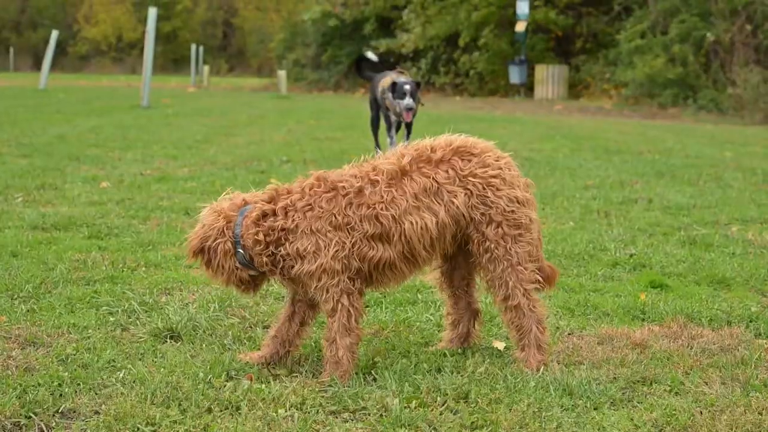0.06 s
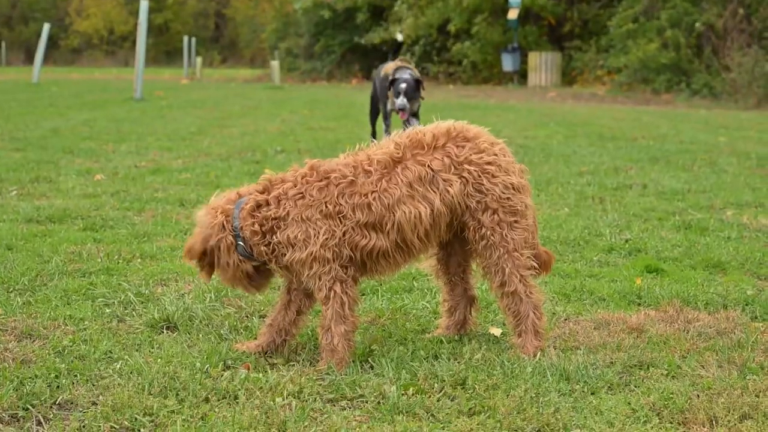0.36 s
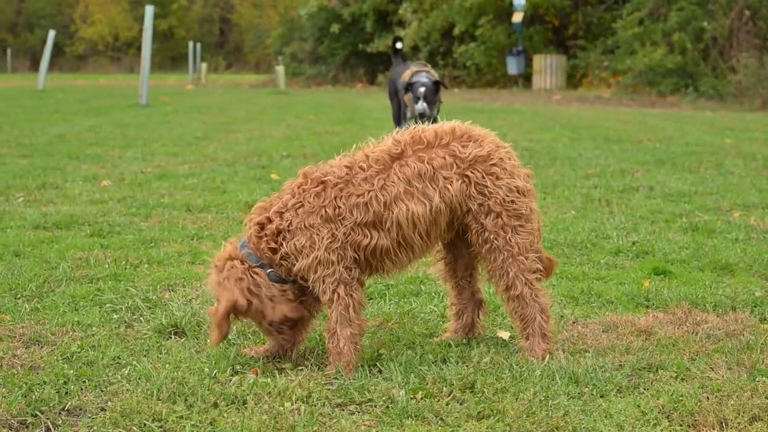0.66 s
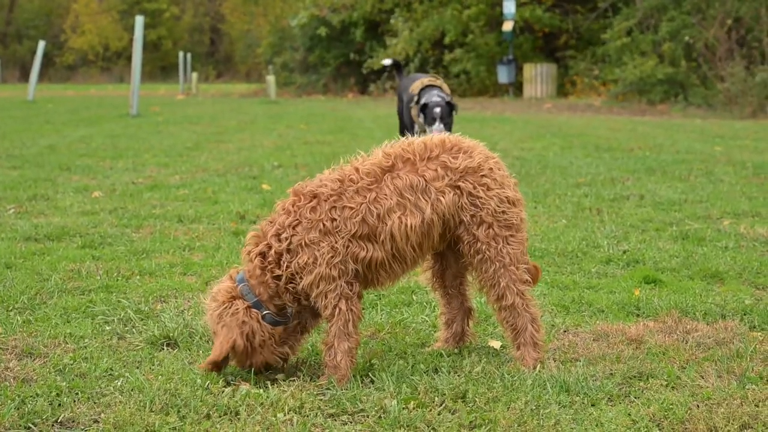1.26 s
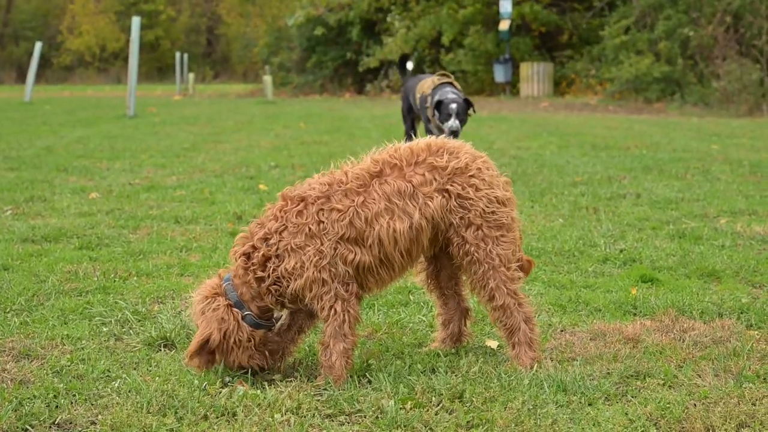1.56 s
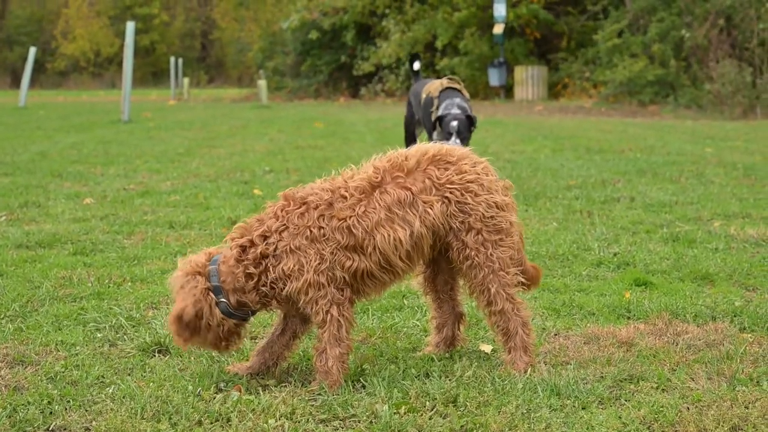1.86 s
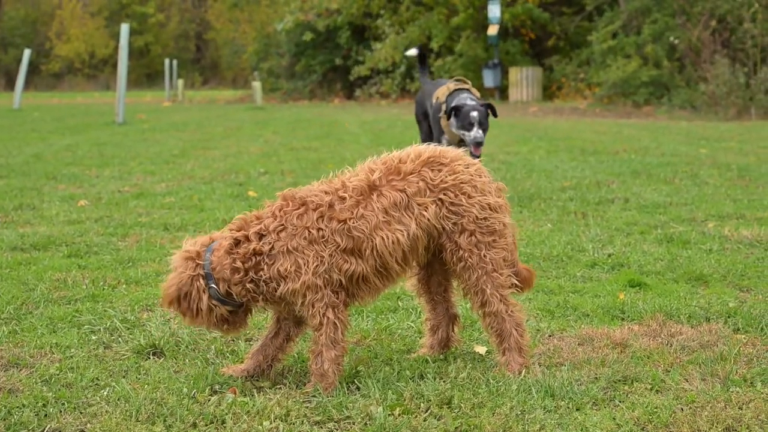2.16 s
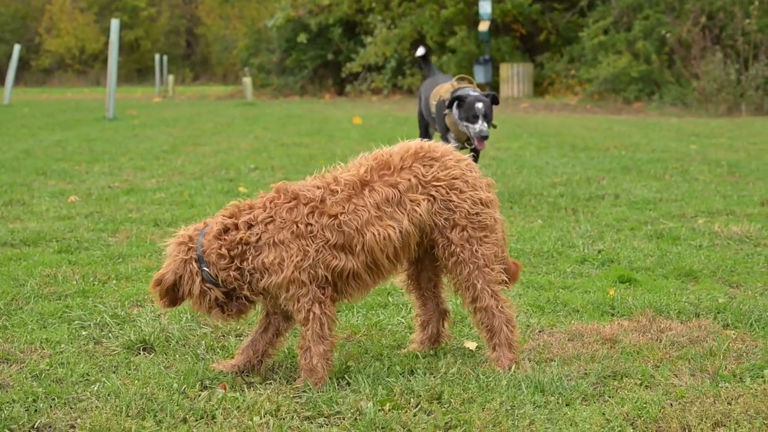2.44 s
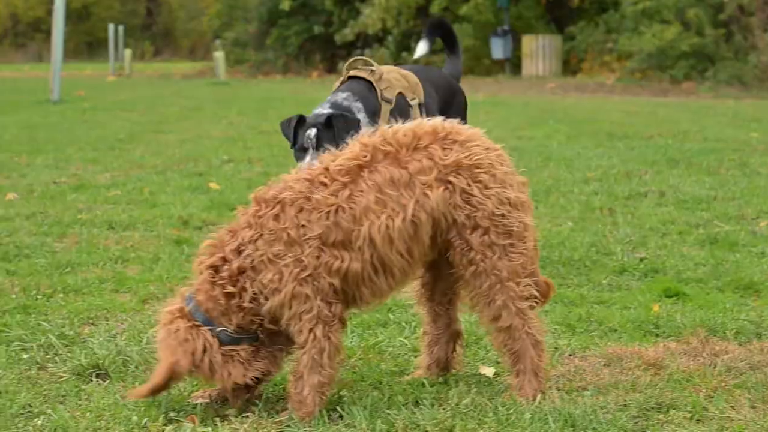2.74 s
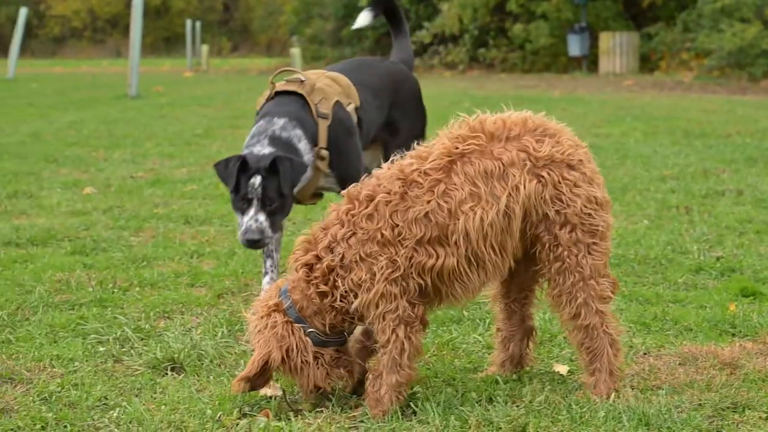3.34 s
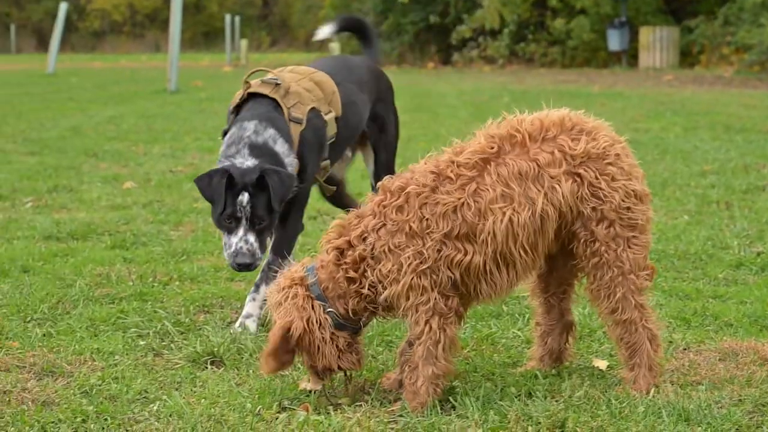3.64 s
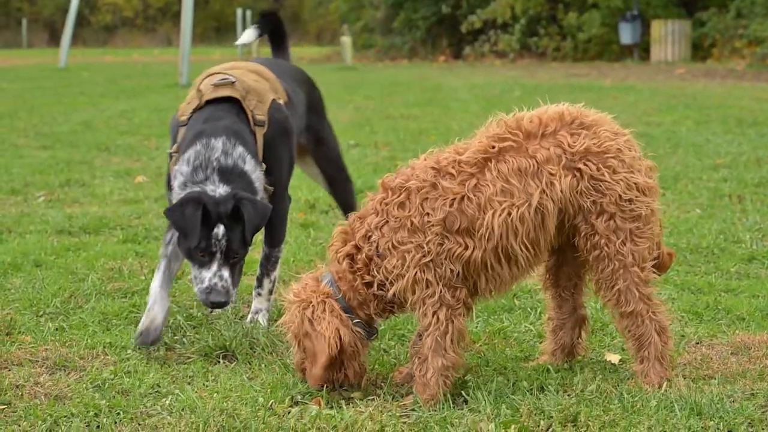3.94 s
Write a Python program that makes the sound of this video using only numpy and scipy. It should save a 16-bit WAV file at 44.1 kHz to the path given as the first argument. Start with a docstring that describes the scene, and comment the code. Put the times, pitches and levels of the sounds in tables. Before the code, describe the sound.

Gusts of wind rumble and sputter against the microphone outdoors, drop to a lull, then hit hardest near the end. A soft hiss of air and distant leaves continues behind them, with barely audible grass rustles and faint ticks.

```python
"""Low, gusty wind rumble buffets a camera's two microphone ports in an open park.
Large eddies rumble in both ports alike; faster ones flutter, roar, rasp and slap, their upper
part mostly on the windward port. Under them lie a steady hiss of air and distant leaves,
a few soft rustles as two dogs nose through the grass, and faint sharp ticks."""
import sys
import numpy as np
from scipy.fft import rfft, irfft, next_fast_len
from scipy.io import wavfile
from scipy.ndimage import uniform_filter1d, map_coordinates

SR = 44100
rng = np.random.default_rng(int(sys.argv[2]) if len(sys.argv) > 2 else 0)


def wav_out(sig):
    """Save sig, one row per channel (or a flat mono array), as 16-bit PCM at SR to the path in sys.argv[1]."""
    wavfile.write(sys.argv[1], SR, np.round(np.clip(np.atleast_2d(sig).T, -1, 1) * 32767).astype(np.int16))


N = 176400

# gust strength: time_s, level_db
GUST_LEVELS = [(0.0, -58), (0.03, -34.5), (0.07, -45.5), (0.12, -26.5), (0.14, -35.5), (0.21, -30.5),
               (0.24, -40), (0.42, -35.5), (0.5, -44.5), (0.58, -38.5), (0.63, -44), (0.68, -34.5),
               (0.71, -44.5), (0.77, -34), (0.89, -49.5), (0.91, -40), (0.97, -65), (1.02, -42),
               (1.12, -39), (1.2, -44.5), (1.27, -33), (1.29, -40.5), (1.37, -31.5), (1.4, -45), (1.5, -36),
               (1.54, -44), (1.57, -35), (1.6, -32), (1.73, -43), (1.78, -36), (1.82, -38), (1.93, -39),
               (1.96, -38), (1.98, -33.5), (2.06, -43), (2.09, -45), (2.27, -37), (2.44, -64), (2.47, -50),
               (2.51, -62.5), (2.55, -43.5), (2.58, -54), (2.7, -43), (2.74, -55.5), (2.97, -50.5),
               (3.05, -55), (3.1, -41), (3.21, -37.5), (3.29, -49), (3.35, -32.5), (3.41, -25),
               (3.44, -26.5), (3.46, -28.5), (3.51, -36), (3.63, -23.5), (3.66, -38), (3.68, -29.5),
               (3.92, -27.5), (3.93, -32.5), (4.0, -34)]
# large-eddy spectrum: freq_hz, density_db
RUMBLE_SPECTRUM = [(12, -44), (25, -7), (45, -2), (80, 3), (130, 2), (200, -1.5), (280, -7), (380, -16),
                   (550, -31), (900, -53), (1500, -85)]
def rumble(ref_db=-32.5, growth=0.98, lump_db=4.5, lumps_per_s=70):
    """Large slow eddies press on the ports in lumps as the gusts come and go."""
    pressure = evened(noise(RUMBLE_SPECTRUM), window_samples=800)
    lumps = flicker(lump_db, lumps_per_s)
    level_db = ref_db + growth * (curve(GUST_LEVELS) - ref_db)
    return unit(pressure * lumps) * amp(level_db)


# strength of the fast flow, also drives churn and rasp: time_s, level_db
FLOW_LEVELS = [(0.0, -48), (0.03, -62.5), (0.2, -37), (0.28, -50), (0.44, -33), (0.47, -51.5),
               (0.62, -61.5), (0.68, -43), (0.72, -50), (0.73, -36), (0.78, -40), (0.79, -31),
               (0.83, -53.5), (0.97, -68.5), (1.14, -49.5), (1.15, -61.5), (1.27, -43), (1.35, -54.5),
               (1.37, -38), (1.39, -67), (1.41, -47), (1.47, -63), (1.49, -38.5), (1.53, -51.5),
               (1.63, -39), (1.64, -55), (1.66, -39.5), (1.76, -55), (1.77, -38.5), (1.85, -51),
               (1.86, -40.5), (2.05, -54), (2.21, -63), (2.22, -41.5), (2.24, -66), (2.25, -47),
               (2.39, -63.5), (2.64, -62.5), (2.71, -54), (2.74, -72.5), (3.17, -60), (3.21, -46),
               (3.24, -67), (3.33, -67), (3.35, -37), (3.36, -45), (3.4, -30), (3.42, -38), (3.52, -40),
               (3.58, -50.5), (3.6, -30.5), (3.61, -44.5), (3.63, -33), (3.65, -37), (3.7, -26),
               (3.72, -41), (3.85, -30), (3.91, -36), (3.92, -31), (4.0, -32)]
FLOW_REF_DB, CALM_DB = -50.5, -56.5
def flutter(eddies_per_s=170, ref_hz=366, octaves_per_db=-0.0861, gain_db=-4.5, tilt_db_per_octave=-1.5):
    """Small eddies sputter at uneven moments, louder and lower in a stronger flow."""
    jitter, strength, size, turn = rng.standard_normal((2000, 4)).T
    time_s = (np.arange(len(jitter)) + 0.458 * jitter) / eddies_per_s
    flow_db = np.interp(time_s, *np.transpose(FLOW_LEVELS))
    spread_octaves = 0.31 * np.clip(size, -2, 2)
    pitch_hz = ref_hz * 2 ** (octaves_per_db * (flow_db - FLOW_REF_DB) + spread_octaves)
    level_db = flow_db + gain_db + np.clip(strength, -2, 1.5)
    level_db += tilt_db_per_octave * spread_octaves  # smaller eddies are weaker
    level_db -= np.maximum(CALM_DB - flow_db, 0)  # they die out in a weak flow
    rows = np.transpose([time_s, level_db, pitch_hz, np.pi * turn])
    return eddies(rows[time_s < N / SR], width_cycles=0.4)


# dense churning around the ports: freq_hz, density_db
CHURN_SPECTRUM = [(100, -12.5), (190, -3.5), (290, 3.5), (400, -2), (520, -7.5), (700, -14), (1000, -30),
                  (1600, -72.5)]
def churn(growth=1.128, gain_db=-1.5):
    """Countless middling eddies merge into a hollow roar as the flow hardens."""
    level_db = FLOW_REF_DB + growth * (curve(FLOW_LEVELS) - FLOW_REF_DB)
    roar = evened(noise(CHURN_SPECTRUM), window_samples=450)
    return unit(roar * flicker(depth_db=3.65, knots_per_s=95)) * amp(level_db + gain_db)


# single hard eddies: centre_s, level_db, pitch_hz
HARD_EDDIES = [(0.1773, -29.5, 840), (.2, -27.5, 544), (0.3382, -30, 406), (0.3627, -26, 546),
               (.377, -31.5, 980), (.408, -21, 456), (.4413, -17, 700), (.676, -27.5, 412),
               (.735, -30, 446), (0.7409, -23, 500), (.7875, -19.5, 364), (1.131, -30.5, 363),
               (1.268, -27, 181), (1.331, -29.5, 360), (1.37, -23.5, 327), (1.497, -35, 464),
               (1.597, -25, 345), (1.607, -15.5, 188), (1.626, -24, 400), (1.771, -24.5, 306),
               (1.794, -20.5, 200), (1.862, -23, 446), (1.879, -28, 415), (1.911, -25.5, 405),
               (1.926, -27, 434), (1.984, -27, 162), (2.258, -25.5, 370), (2.69, -30.5, 226),
               (3.1, -30, 143), (3.191, -25, 189), (3.389, -18.5, 380), (3.596, -24.5, 414),
               (3.63, -18.5, 393), (3.696, -21.5, 610), (3.743, -19.5, 410), (3.811, -25, 547),
               (3.8548, -17, 930), (3.9118, -16.5, 133), (3.944, -21, 545)]
def slaps(gain_db=-1):
    """The hardest eddies hit the ports one by one."""
    rows = [(centre_s, level_db + gain_db, pitch_hz, np.pi)
            for centre_s, level_db, pitch_hz in HARD_EDDIES]
    return eddies(rows, width_cycles=0.27)


# fine eddies at the port's edge: freq_hz, density_db
RASP_SPECTRUM = [(300, -18), (480, 5), (650, 1.5), (850, -1), (1200, -10), (1700, -20), (2300, -33.5),
                 (3500, -63)]
def rasp(growth=1.43, gain_db=-19.5):
    """The finest eddies spit in short bursts, growing faster than the flow."""
    level_db = FLOW_REF_DB + growth * (curve(FLOW_LEVELS) - FLOW_REF_DB)
    bursts = noise(RASP_SPECTRUM) * flicker(depth_db=8.3, knots_per_s=170)
    return unit(bursts) * amp(level_db + gain_db)


# where the wind strikes: time_s, side (-1 right port, +1 left port)
WIND_SIDE = [(0, -0.99), (2.3, -0.94), (3.2, -0.56), (3.35, 1)]
def wind(mono_hz=160, split_hz=760):
    """The bass is the same in both ports; the upper part leans to the windward one."""
    pressure = rumble() + churn() + flutter() + rasp() + slaps()
    above_mono = lambda hz: 1 - 1 / (1 + (hz / mono_hz) ** 6)
    upper = filtered(pressure, lambda hz: above_mono(hz) * hz ** 2 / (hz ** 2 + split_hz ** 2))
    side = curve(WIND_SIDE) * upper
    return np.array([pressure + side, pressure - side])


# background at the left port: freq_hz, density_db
HISS_LEFT_SPECTRUM = [(30, -22), (200, -25), (400, -11.5), (650, 11), (1000, 8.5), (1500, 7), (2200, 5),
                      (3000, 0), (4200, 1), (5200, 1), (6000, -1), (7300, -6), (9000, -5), (10150, -1),
                      (11000, -9.5), (12000, -20), (13500, -30)]
# background at the right port: freq_hz, density_db
HISS_RIGHT_SPECTRUM = [(30, -7), (200, -34), (400, -21.5), (650, 8), (1000, 8.5), (1500, 6), (2200, 5.5),
                       (3000, 3), (4000, 2.5), (5000, -1.5), (6000, -8), (7500, -10), (9200, -11.5),
                       (10500, -9.5), (11900, -3.5), (12600, -11), (13500, -23)]
# left-right likeness: freq_hz, correlation
HISS_CORRELATION = [(300, 1), (700, 1), (1200, 0.72), (2000, 0.016), (4000, 0.35), (7000, 0.19), (12000, 0)]
def hiss(left_db=-58.5, right_db=-60.5, fade_db_per_s=0.5):
    """Air and distant leaves hiss, coloured by each port's own resonance and fading slightly."""
    angle = lambda hz: np.arccos(np.clip(along(HISS_CORRELATION, hz), -1, 1)) / 2
    white = rng.standard_normal((2, N))
    mid, side = filtered(white, lambda hz: np.array([np.cos(angle(hz)), np.sin(angle(hz))]))
    left = amp(left_db) * coloured(mid + side, HISS_LEFT_SPECTRUM)
    right = amp(right_db) * coloured(mid - side, HISS_RIGHT_SPECTRUM)
    drift_db = 0.6 * wobble(knots_per_s=3.65) - fade_db_per_s * (np.arange(N) - N / 2) / SR
    return amp(drift_db) * np.array([left, right])


# swishes in the grass: peak_s, rise_s, fall_s, left_db, right_db
GRASS_SWISHES = [(.28, .2, 0.11, -77, -74), (.86, 0.054, .08, -80, -71), (1.05, 0.021, 0.048, -60, -69),
                 (1.2, 0.072, .08, -69, -67), (2.25, 0.36, 0.075, -79, -69.5)]
# grass at the left port: freq_hz, density_db
GRASS_LEFT_SPECTRUM = [(3000, -30), (6500, -13), (8800, -11), (9600, 2), (10600, -2), (11400, -12),
                       (14000, -30)]
# grass at the right port: freq_hz, density_db
GRASS_RIGHT_SPECTRUM = [(3000, -17), (6500, -4), (10000, -12), (11200, 5), (12000, 3), (13000, -2),
                        (14500, -15)]
def rustles(grain_db=2.7):
    """Dogs brush the grass in thin, grainy swishes that swell and fade."""
    t, swell = np.arange(N) / SR, np.zeros((2, N))
    for peak_s, rise_s, fall_s, left_db, right_db in GRASS_SWISHES:
        width_s = np.where(t < peak_s, rise_s, fall_s)
        swell += amp([[left_db], [right_db]]) * np.exp(-((t - peak_s) / width_s) ** 2)
    grain = unit(amp(grain_db * wobble(knots_per_s=160)))
    return swell * grain * np.array([noise(GRASS_LEFT_SPECTRUM), noise(GRASS_RIGHT_SPECTRUM)])


# dry contacts: start_s, level_db, t60_s
CONTACTS = [(3.3373, -48, 0.013), (3.394, -58, .008), (3.5645, -52, .009), (3.7206, -43, .012),
            (3.7347, -48, 0.0067), (3.7652, -57, .025)]
# contact spectrum: freq_hz, density_db
TICK_SPECTRUM = [(2000, -23), (5000, -12), (6500, 2), (9000, -5), (11800, 2), (13000, -10), (15000, -13.5)]
def ticks(left_db=-12.5, attack_s=0.0005):
    """Tiny dry contacts, perhaps of a harness buckle, tick on the right."""
    envelope = np.zeros(N)
    for start_s, level_db, t60_s in CONTACTS:
        age_s = np.maximum(np.arange(N) / SR - start_s, 0)
        attack = 1 - np.exp(-age_s / attack_s)
        envelope += attack * amp(level_db - 60 * age_s / t60_s)
    return envelope * np.array([amp(left_db) * noise(TICK_SPECTRUM), noise(TICK_SPECTRUM)])


def eddies(rows, width_cycles):
    """Each eddy is one quick push and pull of pressure."""
    pressure, t = np.zeros(N), np.arange(N) / SR
    for centre_s, level_db, pitch_hz, phase_rad in rows:
        near = slice(*np.searchsorted(t, [centre_s - 4 / pitch_hz, centre_s + 4 / pitch_hz]))
        cycles = (t[near] - centre_s) * pitch_hz
        pulse = np.sin(2 * np.pi * cycles + phase_rad) / np.cosh(cycles / width_cycles)
        pressure[near] += amp(level_db) * pulse
    return pressure


def amp(db):
    """Decibels to gain."""
    return 10 ** (np.asarray(db) / 20)


def unit(x):
    """Scale to rms 1."""
    return x / np.sqrt(np.mean(x ** 2) + 1e-20)


def curve(rows):
    """One value per sample from (time_s, value) rows."""
    return np.interp(np.arange(N) / SR, *np.transpose(rows))


def along(rows, hz):
    """(freq_hz, value) rows read on a log axis."""
    freq_hz, values = np.transpose(rows)
    return np.interp(np.log(hz + 1), np.log(freq_hz), values)


def wobble(knots_per_s):
    """A smooth random curve."""
    knots = rng.standard_normal(int(N * knots_per_s / SR) + 4)
    return map_coordinates(knots, [np.arange(N) * knots_per_s / SR])


def flicker(depth_db, knots_per_s):
    """A smooth random gain within +/- depth_db."""
    return amp(depth_db * np.tanh(wobble(knots_per_s)))


def filtered(x, response):
    """x through a gain given as a function of frequency."""
    size = next_fast_len(x.shape[-1] + SR // 2)
    return irfft(rfft(x, size) * response(np.fft.rfftfreq(size, 1 / SR)), size)[..., :x.shape[-1]]


def coloured(x, spectrum):
    """x shaped by (freq_hz, density_db) rows, at rms 1."""
    return unit(filtered(x, lambda hz: amp(along(spectrum, hz))))


def noise(spectrum):
    """Coloured noise at rms 1."""
    return coloured(rng.standard_normal(N), spectrum)


def evened(x, window_samples):
    """Noise with its chance swells levelled out."""
    power = uniform_filter1d(uniform_filter1d(x ** 2, window_samples), window_samples)
    return x / np.sqrt(np.abs(power) + 1e-9)


def scene():
    """Wind on the ports over the quiet park."""
    return wind() + hiss() + rustles() + ticks()


def record(dry):
    """The camera keeps nothing above its band limit."""
    return filtered(dry, lambda hz: hz < 14200)


dry = scene()
out = record(dry)
wav_out(out)
```